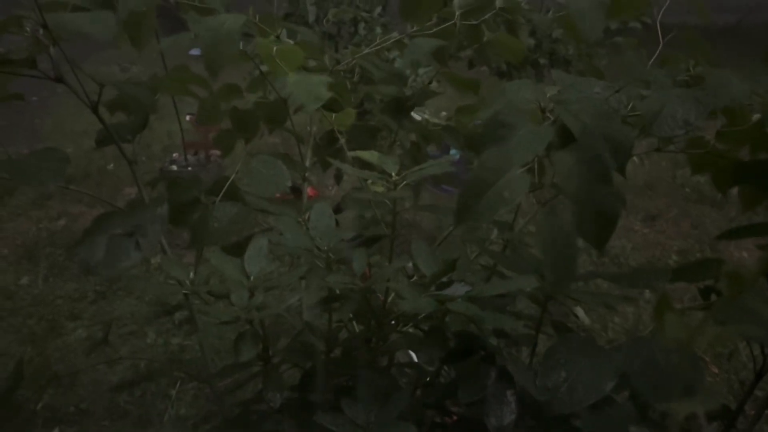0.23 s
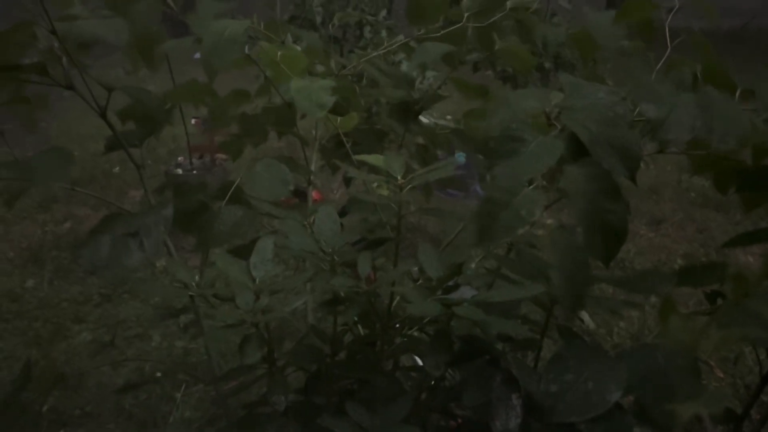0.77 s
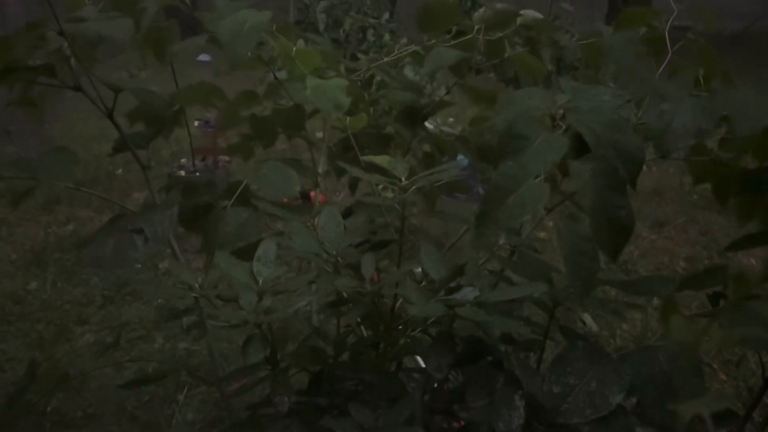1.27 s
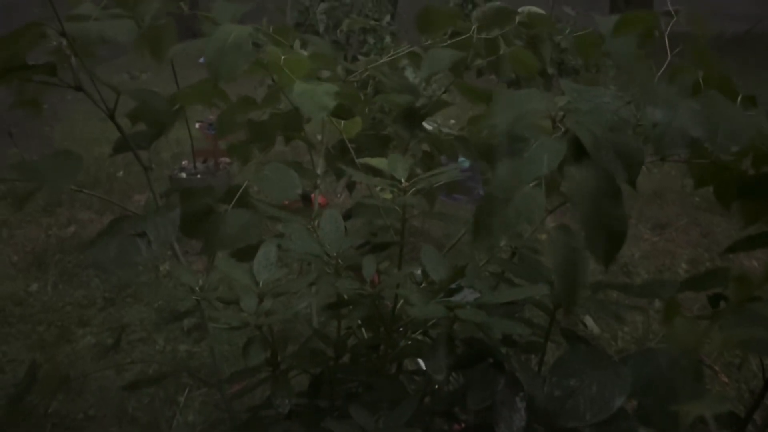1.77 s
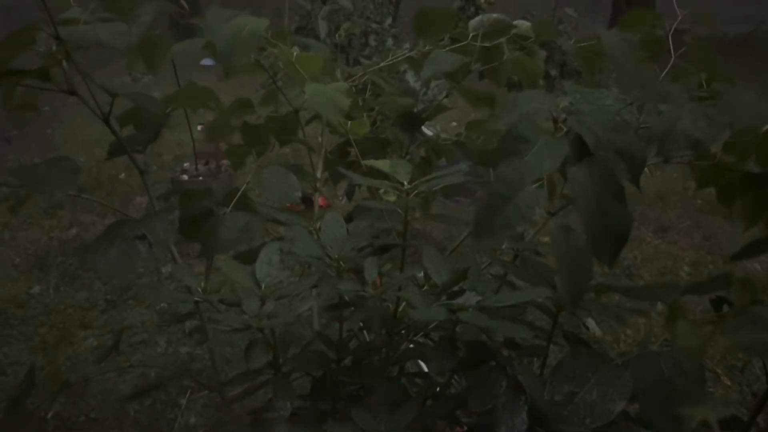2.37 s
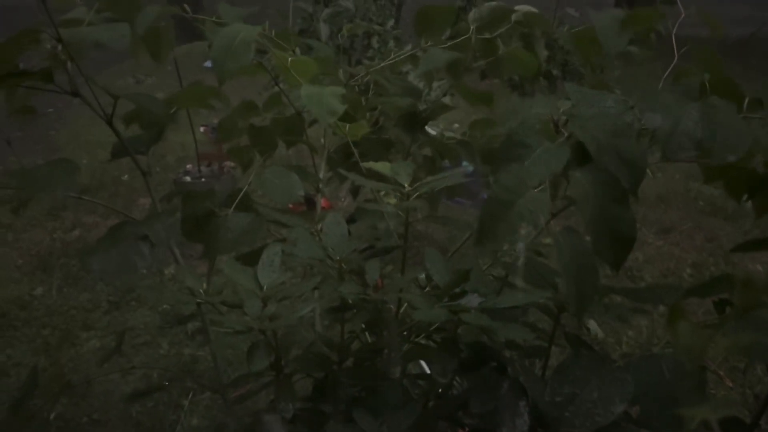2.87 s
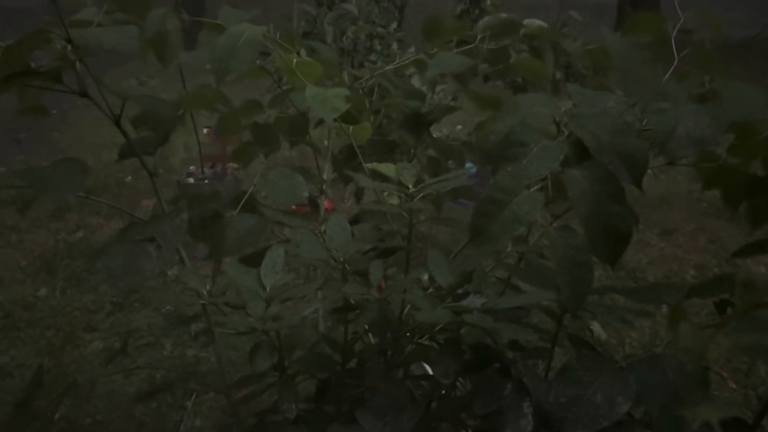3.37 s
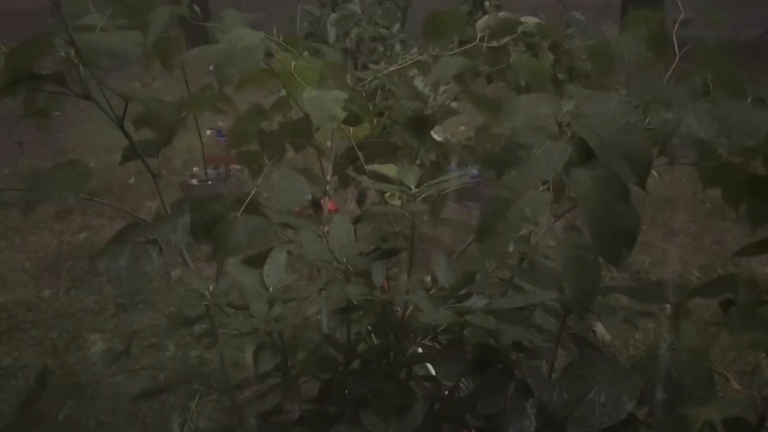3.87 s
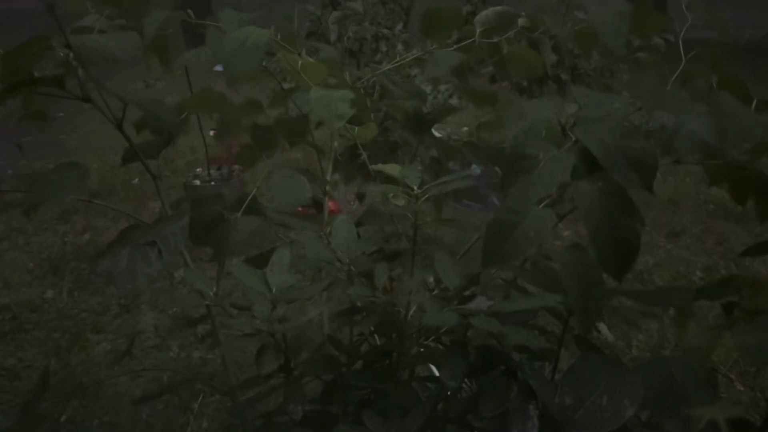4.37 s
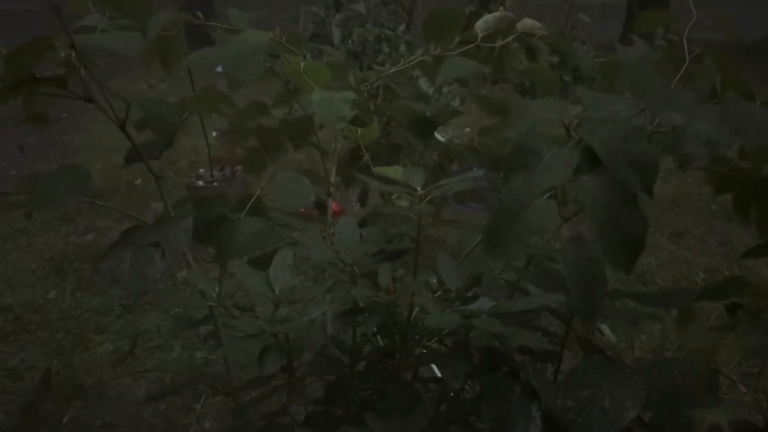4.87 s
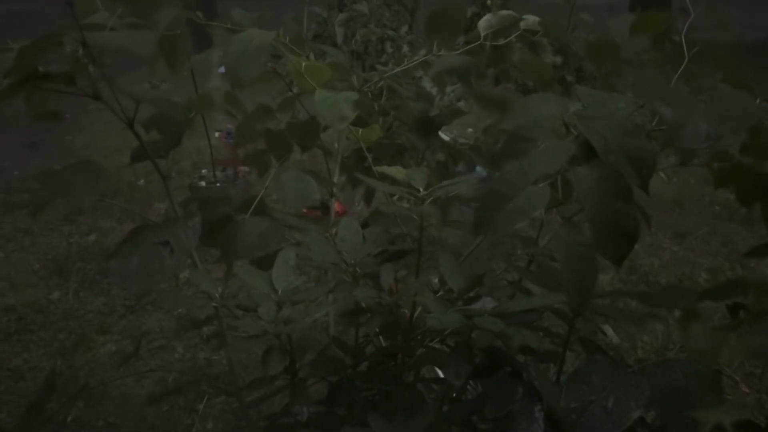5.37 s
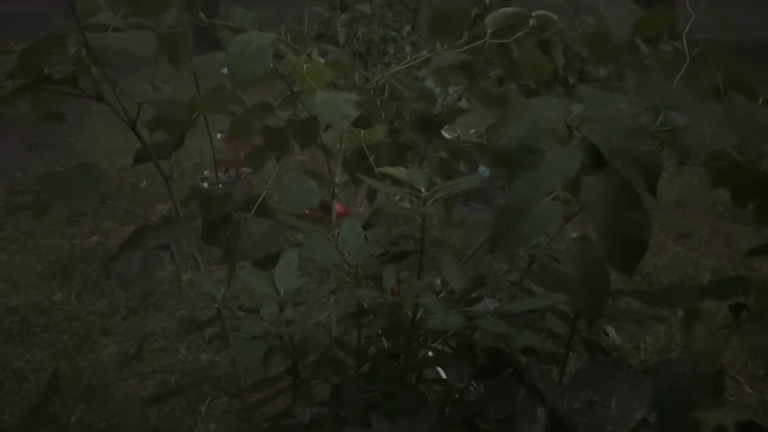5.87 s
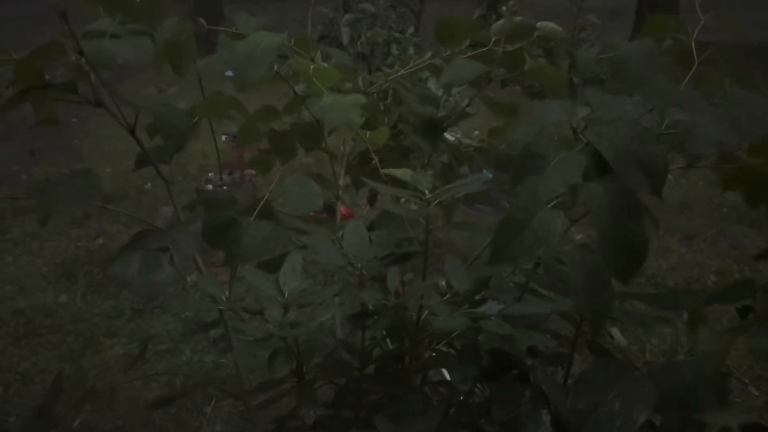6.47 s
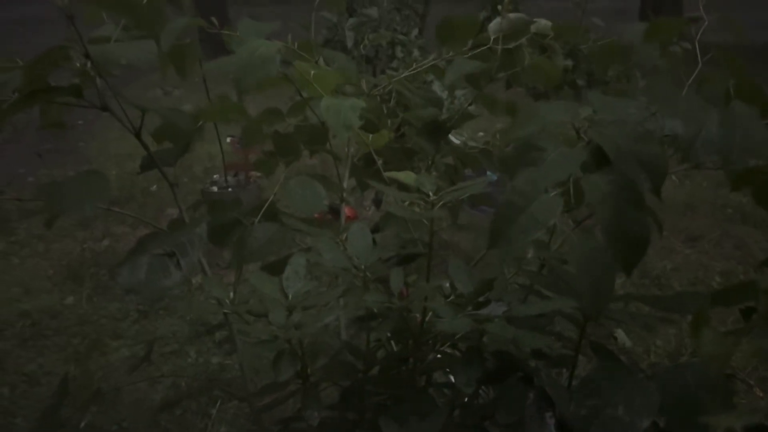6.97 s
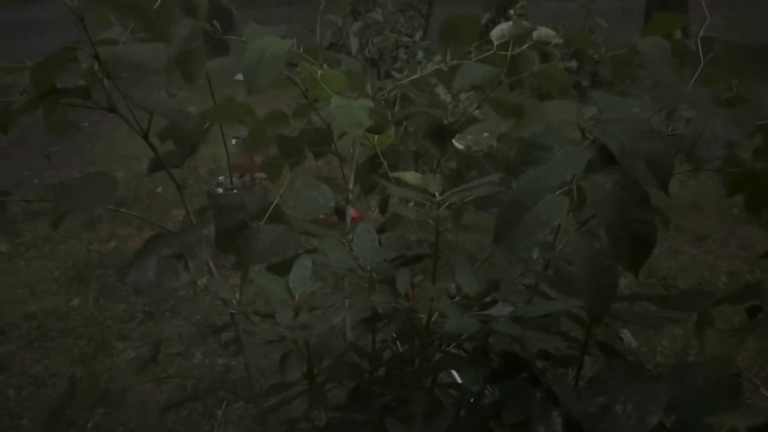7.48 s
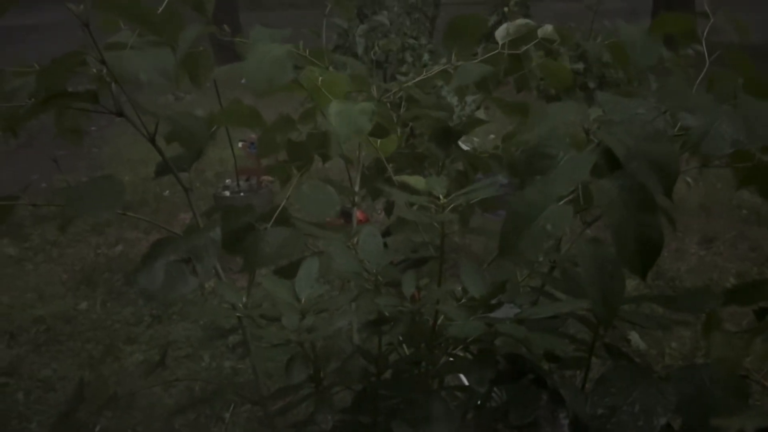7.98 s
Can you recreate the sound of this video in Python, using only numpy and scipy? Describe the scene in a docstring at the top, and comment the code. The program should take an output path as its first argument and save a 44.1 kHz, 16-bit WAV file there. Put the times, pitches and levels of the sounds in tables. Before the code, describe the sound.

Heavy rain falls on a leafy yard, heard close up beneath a cover that drums hollowly. Dense patter and low rumble open the scene; two fat drops snap loudly near the microphone at about 0.8 and 1.6 seconds. The rain then drops back to scattered leaf splats and tiny ticks around 3 seconds, before drumming and patter build up again to the end. A fine high hiss never stops.

```python
"""Heavy rain on a leafy yard, heard under a cover that drums hollowly, with a steady high hiss throughout.
From the start random impacts ring resonances, patter and wash; drops splat on leaves, drum and tick.
Two fat drops, at 0.8 s and 1.6 s, snap at the microphone and ring with diving pitch; low bumps shake it.
The downpour eases from about 2 s, then builds again; soft bumps return near the end.
The channels differ in phase and tone across the spectrum."""
import sys
import numpy as np
from scipy import signal
from scipy.fft import rfft, irfft, next_fast_len
from scipy.io import wavfile
from scipy.ndimage import map_coordinates

SR = 44100
rng = np.random.default_rng(int(sys.argv[2]) if len(sys.argv) > 2 else 0)


def to_wav(s):
    """Save 16-bit WAV."""
    ch = np.atleast_2d(s).T  # columns
    pcm = np.round(np.clip(ch, -1, 1) * 32767)  # PCM
    wavfile.write(sys.argv[1], SR, pcm.astype(np.int16))


N = 362943

# the downpour holds, eases and builds again; the patter is trimmed further in its own function:
# (time [s], patter [dB], drumming of the cover [dB], bass [dB])
RAIN_LEVELS = [(0, -45.5, -46.5, -44), (0.45, -44.5, -46, -43.5), (1.2, -45, -43.5, -45.5),
               (1.85, -45.5, -44, -42.5), (1.98, -48, -60.5, -55), (2.45, -51.5, -57.5, -57.5),
               (2.68, -57.5, -59.5, -60), (2.95, -72.5, -53.5, -62), (3.45, -61, -55, -66.5),
               (3.85, -52.5, -49, -67.5), (4.45, -58.5, -45, -65), (4.9, -51.5, -45.5, -61),
               (5.8, -46.5, -43.5, -60), (6.6, -47, -45, -56.5), (7.45, -46.5, -43.5, -59),
               (7.66, -49, -49.5, -52), (7.95, -47, -44.5, -46), (8.23, -46.5, -49, -52)]
# the cover's resonances, the first swinging longest: (frequency [Hz], width [Hz], level [dB])
COVER_MODES = [(393.8, 22.5, 0.5), (438, 53, -3.5), (590, 91, -20.5), (777, 97, -18)]
# the heaviest drops on the cover: (time [s], level [dB], pitch [Hz], t60 [s])
DRUM_HITS = [(0.189, -29, 431, 0.083), (0.288, -29, 394, 0.063), (0.345, -33, 398, 0.14),
             (0.378, -31, 366, 0.093), (0.413, -26, 435, 0.06), (0.439, -26, 408, 0.051),
             (0.512, -33, 397, 0.1), (0.553, -32.5, 394, 0.16), (0.586, -30, 273, .08),
             (0.846, -20, 307, 0.033), (1.214, -33, 405, 0.068), (1.334, -27, 395, 0.053),
             (1.512, -23.5, 381, 0.096), (1.642, -28, 392, .05), (1.753, -29.5, 273, 0.055),
             (2.784, -48, 400, 0.099), (2.946, -43, 399, 0.3), (3.099, -47, 403, 0.24),
             (3.345, -43.5, 399, .11), (3.453, -47, 390, 0.15), (3.734, -33, 394, 0.068),
             (3.964, -38, 380, 0.061), (4.205, -39, 427, 0.062), (4.299, -34, 420, 0.045),
             (4.352, -35, 345, 0.039), (4.373, -32, 300, 0.069), (4.785, -33, 389, 0.065),
             (4.858, -28, 487, 0.037), (4.895, -33.5, 460, 0.061), (4.984, -35, 427, 0.041),
             (5.076, -33, 400, 0.048), (5.151, -30, 398, .04), (5.391, -34, 400, .09),
             (5.487, -32, 394, 0.038), (5.684, -27.5, 368, 0.061), (5.905, -34, 406, 0.055),
             (5.985, -26, 366, 0.045), (6.105, -24.5, 403, 0.041), (6.311, -26, 394, 0.055),
             (6.55, -32, 400, 0.098), (7.054, -29, 390, 0.07), (7.366, -26, 395, 0.075),
             (7.396, -28, 390, .07), (7.764, -26.5, 385, .075), (7.824, -25, 393, 0.05),
             (8.015, -28, 397, 0.057), (8.149, -35.5, 390, .06), (8.165, -41.5, 637, 0.22),
             (8.185, -39, 718, 0.25)]
# the loudest splats on near leaves: (time [s], level before trim [dB], pitch [Hz], spray t60 [s], leaf ring [dB])
LEAF_SPLATS = [(0.116, -39.5, 2310, 0.037, 8.5), (0.291, -31, 700, .05, -5), (1.335, -45, 3770, 0.072, 0),
               (1.642, -36, 900, .04, -2), (1.666, -45, 2320, 0.046, 10), (1.754, -37, 900, 0.022, 0),
               (1.774, -43, 2360, 0.038, 11), (2.003, -44, 1350, .05, 2), (2.027, -42, 1360, 0.054, 2),
               (2.133, -38, 1450, 0.08, -8), (2.157, -41, 1200, .04, -2), (2.3212, -36.5, 1750, 0.07, -3),
               (2.357, -42, 1100, .05, -2), (2.425, -47, 1900, .04, 2), (2.4632, -35.5, 2060, 0.086, 4),
               (2.616, -47, 1190, .09, -8), (3.1796, -46, 1750, .07, -3), (3.295, -57, 2430, .04, 3),
               (3.38, -53, 2300, .04, 7), (3.5523, -51, 2350, .04, 3), (3.65, -54, 2030, .04, -2),
               (3.7113, -36, 1650, 0.092, -6), (4.259, -54, 1290, .06, -2), (4.31, -44.5, 3140, .04, -3),
               (4.855, -48, 2700, 0.044, 1), (4.983, -36, 900, .04, 0), (5.5748, -35, 1180, 0.1, 0),
               (5.834, -41, 1660, 0.05, -6), (5.9619, -33, 970, 0.22, -6), (6.012, -37.5, 1330, 0.08, -4),
               (6.358, -38, 2300, 0.15, -8), (6.3812, -34.5, 1220, 0.11, 4), (6.4926, -38, 1620, 0.091, -6),
               (6.511, -43.5, 3080, .05, -8), (6.853, -33, 1300, 0.075, 0), (7.381, -39, 1350, 0.16, -1),
               (7.764, -34, 700, .04, -4), (7.8235, -36, 1210, 0.068, 0), (7.893, -38.5, 1590, 0.067, -9),
               (7.9968, -46, 2380, .05, 10)]
# the clearest tiny droplets: (time [s], level [dB], left over right [dB], low click against the fizz [dB])
DROPLET_TICKS = [(0.38, -51, -6, 1), (0.8132, -54.5, 6, 16), (1.433, -49, -10, -8), (1.5664, -36, -14, -10),
                 (2.157, -43, -18, -9), (2.471, -49, -20, -5), (2.685, -49.5, -14, -9), (3.12, -55, -8, 1),
                 (3.134, -48, -10, -11), (3.595, -46, -14, -8), (3.7936, -45.5, -21, -16),
                 (3.9098, -48, -1, 5), (4.371, -36.5, -10, -12), (4.503, -42, -5, -0.5),
                 (4.756, -40.5, -1, -5), (6.363, -54, 0, 7), (6.503, -54, 0, 6), (7.703, -43, -16, -8),
                 (8.025, -48, -13, -8)]
# fat drops at the microphone: (time [s], level [dB], starting pitch [Hz], t60 before loss per cycle [s],
# ring left over right [dB], snap [dB], treble edge [Hz], lag of the right ring [s])
FAT_DROPS = [(0.8174, -11, 2780, 0.048, 7.5, -34, 3940, .0002),
             (1.592, -12.5, 1770, 0.19, 10, -16.5, 4370, 0.00058)]
# soft bumps on the microphone: (time [s], peak [dB], pitch [Hz], time from peak to 1/e [s])
MIC_BUMPS = [(1.631, -35, 45, 0.023), (1.875, -30.5, 62, 0.027), (2.379, -43, 65, 0.026),
             (7.631, -38, 62, 0.016), (7.673, -35, 50, 0.029)]
# low roar of the rain, spectrum: (frequency [Hz], relative level [dB])
RUMBLE_SPECTRUM = [(20, -51), (45, -2), (70, -2.5), (92, 3), (135, -2.5), (190, -5), (300, -34.5),
                   (700, -37), (3000, -120)]
# near patter, spectrum: (frequency [Hz], relative level [dB])
PATTER_SPECTRUM = [(150, -28.5), (300, -2.5), (480, 0), (600, 0), (850, -5), (1050, -3.5), (1300, -4.5),
                   (1800, -10), (2400, -11.5), (3300, -23.5), (6000, -27.5), (12000, -89)]
# merged drops on far leaves, spectrum: (frequency [Hz], relative level [dB])
WASH_SPECTRUM = [(200, -26), (800, 1.5), (1400, -4), (1850, 0), (2300, 2), (3200, -4.5), (4200, -2),
                 (5200, -9.5), (6400, -8.5), (7500, -18), (10000, -22), (12500, -27.5), (16000, -39)]
# fizz of a droplet, spectrum: (frequency [Hz], relative level [dB])
FIZZ_SPECTRUM = [(1500, -28), (4000, -10), (6500, 1.5), (8600, 26), (11000, -4), (14500, -3), (16500, -14)]
# steady hiss shared by the channels, spectrum: (frequency [Hz], relative level [dB])
HISS_SPECTRUM = [(1000, -55), (5000, -34), (8000, -10.5), (11000, -28), (12500, -15), (14000, -5),
                 (15500, -6.5), (16100, -22)]
# brighter hiss band on the right, spectrum: (frequency [Hz], relative level [dB])
RIGHT_HISS_SPECTRUM = [(7000, -42), (7850, -78), (8000, 12), (8500, 5.5), (9300, 2.5), (10200, -9),
                       (11000, -15.5), (13000, -55)]
# likeness of the channels, clipped to -1..1: (frequency [Hz], likeness [correlation])
CHANNEL_LIKENESS = [(100, 3.3), (380, 1), (600, 0.43), (1000, 0.45), (2000, 0), (3000, -0.14), (4100, 0.7),
                    (5000, 0.04), (6000, 0.25), (16000, 3)]
# phase between the channels: (frequency [Hz], lead of the left [rad])
CHANNEL_PHASE = [(0, 0), (340, 0), (400, -.2), (520, -.6), (1210, -5.7), (2200, -6.5), (3000, -9.4),
                 (16000, 31.3)]
# tone difference between the channels: (frequency [Hz], left over right [dB])
CHANNEL_TILT = [(350, 0.5), (420, -1.5), (520, -2.5), (800, 0), (1050, 1.5), (1500, -1), (2200, -3),
                (2750, 3.5), (3250, 4), (4000, 0.5), (16000, 1)]
# thud of the cover, spectrum: (frequency [Hz], relative level [dB])
THUD_SPECTRUM = [(90, -26), (170, -9), (230, 1), (280, 3), (340, 0.5), (450, -9), (700, -38), (2000, -61),
                 (5000, -120)]
# sharp top of a hard droplet, spectrum: (frequency [Hz], relative level [dB])
SHARP_SPECTRUM = [(6000, -40), (11000, -16), (14500, 3), (16500, -14)]
# the bass narrows almost to mono for a while: (time [s], side against middle [dB])
BASS_WIDTH = [(0, -13), (3.5, -12), (4.6, -42), (5.3, -44), (6.6, -18), (8.23, -9)]
# low click of a droplet, spectrum: (frequency [Hz], relative level [dB])
CLICK_SPECTRUM = [(1500, -25), (3700, 11), (6500, 8), (9000, -5), (12000, -25)]
# first snap of a fat drop, spectrum: (frequency [Hz], relative level [dB])
SNAP_SPECTRUM = [(1000, -37), (4000, -25), (5500, -2), (6500, 13.5), (8000, 15), (10500, -14), (12500, -10),
                 (14300, 13), (16500, 1)]
# dull slap of the cover, spectrum: (frequency [Hz], relative level [dB])
SLAP_SPECTRUM = [(200, -33.5), (330, -8), (480, 3), (580, -2.5), (700, -6.5), (850, -6.5), (1200, -19),
                 (3000, -62.5)]

TOP_HZ = 16600
# the cover's thud grows with bass and patter (dB at their mean levels, dB per dB of each)
THUD_DB, THUD_PER_BASS, THUD_PER_PATTER = -57.5, 0.98, 0.39
# a squall of drops makes it thud harder once (centre s, extra dB, time from peak to 1/e of that dB, s)
SQUALL_S, SQUALL_DB, SQUALL_LENGTH_S = 6, 11.5, 0.35
# the upper resonances fade when the patter eases (dB per dB of patter)
OVERTONES_PER_PATTER = 0.32
# slap over the mean of the patter and drumming levels (dB)
SLAP_DB = -5
# lesser splats: level over the patter (dB), scatter (dB), pitch (Hz), scatter (log pitch), t60 (s)
SPLAT_OVER_DB, SPLAT_SCATTER_DB, SPLAT_HZ, SPLAT_DETUNE, SPLAT_T60_S = 0, 1.2, 1400, .25, .03
# fainter droplets: level (dB), size scatter (dB), left over right (dB)
FAINT_TICK_DB, FAINT_TICK_SCATTER_DB, FAINT_TICK_PAN_DB = -49, 1.8, -4


def amp(db):
    """Decibels to gain."""
    return 10 ** (np.asarray(db) / 20)


def unit(x):
    """x at rms 1."""
    return x / np.sqrt(np.mean(x ** 2) + 1e-20)


def along(points, hz):
    """(Hz, value) points read on a log frequency axis."""
    f, v = np.transpose(points)
    return np.interp(np.log(hz + 1), np.log(f + 1), v)


def wobble(rate):
    """A smooth random curve, rate knots a second."""
    knots = rng.standard_normal(int(N * rate / SR) + 4)
    return map_coordinates(knots, [np.arange(N) * rate / SR])


def filtered(x, response):
    """x times a complex response of frequency."""
    m = 2 * next_fast_len(N // 2 + SR // 4)
    return irfft(rfft(x, m) * response(np.fft.rfftfreq(m, 1 / SR)), m)[..., :N]


def coloured(x, spectrum):
    """x through a causal filter with the given spectrum, so that attacks stay sharp."""
    def response(hz):
        cepstrum = irfft(np.log(amp(along(spectrum, hz))))
        half = len(cepstrum) // 2
        return np.exp(rfft(np.r_[cepstrum[0], 2 * cepstrum[1:half]], len(cepstrum)))
    return filtered(x, response)


def add(track, s, sound):
    """Mix a sound into a track at time s."""
    start = max(round(s * SR), 0)
    part = track[..., start:][..., :sound.shape[-1]]
    part += sound[..., :part.shape[-1]]


def panned(sound, pan_db):
    """A mono sound placed between left and right."""
    return sound * amp([[pan_db / 2], [-pan_db / 2]])


def spread(pair):
    """Two unrelated signals become one stereo field of rms 1, its likeness set by frequency."""
    def mid_and_side(hz):
        turn = np.arccos(np.clip(along(CHANNEL_LIKENESS, hz), -1, 1)) / 2
        return np.array([np.cos(turn), np.sin(turn)])
    mid, side = filtered(pair, mid_and_side)
    return unit(np.array([mid + side, mid - side]))


def noise_pair():
    """Two unrelated streams of white noise."""
    return rng.standard_normal((2, N))


def impacts(rate, scatter_db):
    """Two streams of random impacts, rate a second in each, of uneven size."""
    falls = rng.random((2, N)) < rate / SR
    size = amp(scatter_db * np.clip(rng.standard_normal((2, N)), -2, 2))
    return unit(falls * size * rng.choice([-1, 1], (2, N)))


def rain_at(s):
    """Levels of patter, drumming and bass at time s, in dB."""
    times, *columns = np.transpose(RAIN_LEVELS)
    return [np.interp(s, times, c) for c in columns]


def stray_drops(count):
    """Rows of (time s, size, pitch) at random; size and pitch scatter about 0 with a spread of 1."""
    u = rng.random((count, 3))
    return np.column_stack([u[:, 0] * N / SR, np.sqrt(12) * (u[:, 1:] - .5)])


def downpour():
    """Drops rumble, thud, slap and drum on the cover, patter around it and wash the far leaves."""
    patter_db, drum_db, bass_db = rain_at(np.arange(N) / SR)
    follow_db = patter_db - np.mean(patter_db)
    # the blows that ring the cover also give the patter and slap their edge
    hits = impacts(rate=320, scatter_db=2.5)
    # patter and slap come in the same clumps
    clumps_db = 1.2 * wobble(15) + 2.1 * wobble(60)
    slap_db = (patter_db + drum_db) / 2 + SLAP_DB + clumps_db
    cover = cover_drumming(hits, drum_db, follow_db) + cover_thud(bass_db, follow_db)
    near = rumble(bass_db) + patter(hits, patter_db + clumps_db) + slap(hits, slap_db)
    return cover + near + wash() + leaves(follow_db)


def cover_drumming(hits, drum_db, follow_db):
    """Blows excite the cover's resonances; the upper ones need hard rain."""
    def rung(modes):
        def response(f):
            # a soft cover passes little below and above its resonances
            soft = 1j * f / (400 + 1j * f) / (1 + 1j * f / 1500)
            return soft * sum(amp(db) * c * w / (c * c - f * f + 1j * f * w) for c, w, db in modes)
        return filtered(hits, response)
    overtones = amp(OVERTONES_PER_PATTER * follow_db) * rung(COVER_MODES[1:])
    return amp(drum_db + 1.2 * wobble(5)) * spread(rung(COVER_MODES[:1]) + overtones)


def cover_thud(bass_db, follow_db):
    """Dense low impacts thud on the cover, harder during the squall."""
    thud_db = THUD_DB + THUD_PER_BASS * (bass_db - np.mean(bass_db)) + THUD_PER_PATTER * follow_db
    squall = np.exp(-((np.arange(N) / SR - SQUALL_S) / SQUALL_LENGTH_S) ** 2)
    level_db = thud_db + SQUALL_DB * squall + 1.0 * wobble(6.0)
    return amp(level_db) * spread(coloured(impacts(rate=700, scatter_db=3.0), THUD_SPECTRUM))


def rumble(bass_db):
    """Dense impacts merge into a bass roar of changing stereo width."""
    mid, side = unit(coloured(impacts(rate=1500, scatter_db=1.0), RUMBLE_SPECTRUM))
    width = amp(np.interp(np.arange(N) / SR, *np.transpose(BASS_WIDTH)))
    return amp(bass_db) * np.array([mid + width * side, mid - width * side])


def patter(hits, level_db):
    """Distinct blows, dense drops and noise make the clumped near patter."""
    drops = amp(-10.5) * hits + impacts(rate=1500, scatter_db=0.5) + amp(-3.0) * noise_pair()
    return amp(level_db - 2.5) * spread(coloured(drops, PATTER_SPECTRUM))


def slap(hits, level_db):
    """Blows slap dully on the cover, midway between patter and drumming."""
    blows = hits + impacts(rate=600, scatter_db=2.5)
    return amp(level_db) * spread(coloured(blows, SLAP_SPECTRUM))


def wash(level_db=-58.5):
    """Far drops merge into noise that wavers but does not follow the near rain."""
    drops = noise_pair() + amp(-6.5) * impacts(rate=1100, scatter_db=16.0)
    return amp(level_db + 1.67 * wobble(7.0)) * spread(coloured(drops, WASH_SPECTRUM))


def leaves(follow_db, level_db=-64.0):
    """Many small leaf rings swell and ease with the patter."""
    leaf_rings = plips(count=1500, pitch_hz=2150, cycles=4.5, scatter_db=4.0)
    return amp(level_db + 0.69 * follow_db) * leaf_rings


def plips(count, pitch_hz, cycles, scatter_db):
    """Stray drops ring single leaves for a few cycles, each with its own pitch, size and side."""
    track, t = np.zeros((2, N)), np.arange(SR // 30) / SR
    times = rng.random(count) * N / SR
    traits = np.clip(rng.standard_normal((count, 4)), -2, 2)
    for s, (pitch, life, size, side) in zip(times, traits):
        turns = pitch_hz * np.exp(.33 * pitch) * t
        ring = np.sin(2 * np.pi * turns) * np.exp(-turns / (cycles * 1.4 ** life))
        # higher rings are quieter
        add(track, s, panned(amp(scatter_db * size - 2.5 * pitch) * ring, 4 * side))
    return unit(track)


def hiss():
    """A steady high noise hiss in both channels, with a brighter band on the right."""
    both = amp(-74.0) * unit(coloured(rng.standard_normal(N), HISS_SPECTRUM))
    right = amp(-58.5) * unit(coloured(rng.standard_normal(N), RIGHT_HISS_SPECTRUM))
    return np.array([both, both + right])


def splats(lesser_ring_db=0):
    """A drop bursts on a leaf: a sharp spat, then a short spray around the pitch at which it rings."""
    track, t = np.zeros((2, N)), np.arange(SR // 8) / SR
    lesser = []
    for s, size, pitch in stray_drops(count=18):
        db = rain_at(s)[0] + SPLAT_OVER_DB + SPLAT_SCATTER_DB * size
        lesser.append((s, db, SPLAT_HZ * np.exp(SPLAT_DETUNE * pitch), SPLAT_T60_S, lesser_ring_db))
    for s, db, hz, t60, ring_db in LEAF_SPLATS + lesser:
        leaf = signal.butter(3, [hz * .52, hz * 1.3], "band", fs=SR)
        spray = unit(signal.lfilter(*leaf, rng.standard_normal((2, len(t)))))
        ring = amp(ring_db) * np.sin(2 * np.pi * hz * t) * amp(-60 * t / .028)
        # a slower spray under a 12 ms spat
        burst = amp(-2 - 60 * t / t60) + amp(2 - 60 * t / .012)
        attack = 1 - np.exp(-t / .0005)
        add(track, s, amp(db - 5.5) * attack * (spray * burst + ring))
    return track


def drums():
    """A heavy drop thuds on the cover and sets it swinging as a decaying sine."""
    track, t = np.zeros(N), np.arange(SR // 5) / SR
    thud = unit(coloured(rng.standard_normal(N), PATTER_SPECTRUM))
    for s, db, hz, t60 in DRUM_HITS:
        swing = np.sin(2 * np.pi * hz * t) * amp(-60 * t / t60)
        noise = np.roll(thud, -round(s * SR))[:len(t)]
        contact = amp(-15.0) * noise * amp(-60 * t / 0.032)
        attack = 1 - np.exp(-t / 0.0011)
        add(track, s, amp(db) * attack * (swing + contact))
    return track


def ticks():
    """Droplets click close by within a few milliseconds; the harder the droplet, the sharper its top."""
    track, t = np.zeros((2, N)), np.arange(SR // 50) / SR
    colours = (FIZZ_SPECTRUM, SHARP_SPECTRUM, CLICK_SPECTRUM)
    fizz, top, click = [unit(coloured(rng.standard_normal(N), colour)) for colour in colours]
    age = t / 0.00057
    faint = [(s, FAINT_TICK_DB + FAINT_TICK_SCATTER_DB * size, FAINT_TICK_PAN_DB, -6)
             for s, size, _ in stray_drops(count=6)]
    for s, db, pan_db, click_db in DROPLET_TICKS + faint:
        blend = fizz + amp(0.88 * (db + 22)) * top + amp(click_db) * click
        noise = np.roll(blend, -round(s * SR))[:len(t)]
        add(track, s, panned(amp(db) * noise * age ** 2 * np.exp(-age), pan_db))
    return track


def taps(loss_per_cycle_db=3.0):
    """A fat drop snaps, with a short band of grainy noise dying away; its ring dives in pitch."""
    track, t = np.zeros((2, N)), np.arange(SR // 10) / SR
    for s, db, hz, t60, pan_db, snap_db, edge_hz, lag_s in FAT_DROPS:
        age = np.maximum(t - np.array([[0], [lag_s]]), 0)
        # each cycle lasts about twice as long as the one before
        cycles = 1.3 * np.log1p(hz * age / 1.3)
        ring = -np.sin(2 * np.pi * cycles) * amp(-60 * age / t60 - loss_per_cycle_db * cycles)
        grains = impacts(rate=2500, scatter_db=4)[:, :len(t)]
        noise_band = unit(signal.lfilter(*signal.butter(1, [900, 3000], "band", fs=SR), grains))
        noise_tail = noise_band * amp(-21 - 60 * t / .08)
        # water is soft: little but the first snap reaches above the edge
        soften = signal.butter(5, min(edge_hz, SR / 3), fs=SR)
        body = signal.lfilter(*soften, panned(ring, pan_db) + noise_tail)
        crack = unit(coloured(rng.standard_normal(N), SNAP_SPECTRUM))[-len(t):]
        snap = amp(snap_db - 60 * t / 0.0035) * crack
        add(track, s, amp(db) * (body + snap))
    return track


def bumps():
    """Soft low thuds: cosines a few cycles long under a bell-shaped swell."""
    track, t = np.zeros(N), np.arange(N) / SR
    for s, db, hz, length in MIC_BUMPS:
        swell = np.exp(-((t - s) / length) ** 2)
        track += amp(db) * swell * np.cos(2 * np.pi * hz * (t - s))
    return track


def scene():
    """Phase and tone differ between the channels for all but the ticks and taps, which set their own."""
    def sides(hz):
        phase = np.interp(hz, *np.transpose(CHANNEL_PHASE))
        half = amp(along(CHANNEL_TILT, hz) / 2) * np.exp(.5j * phase)
        return np.array([half, 1 / half])
    around = downpour() + hiss() + splats() + drums() + bumps()
    return filtered(around, sides) + ticks() + taps()


def record(dry):
    """Nothing is kept above the band limit."""
    return filtered(dry, lambda hz: hz < TOP_HZ)


dry = scene()
out = record(dry)
to_wav(out)
```